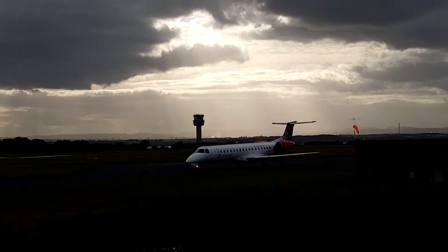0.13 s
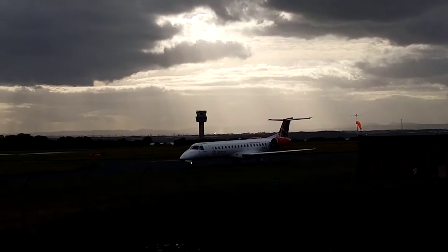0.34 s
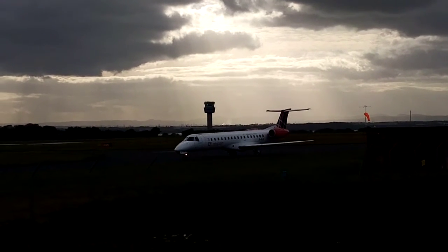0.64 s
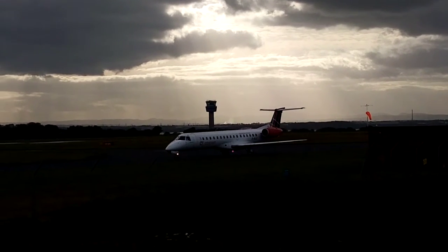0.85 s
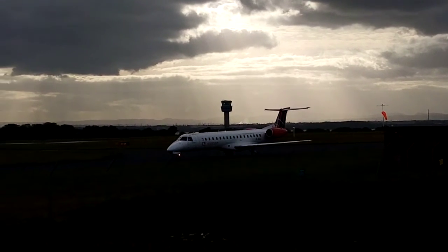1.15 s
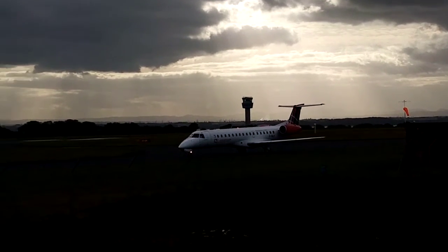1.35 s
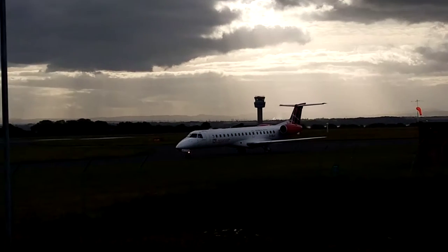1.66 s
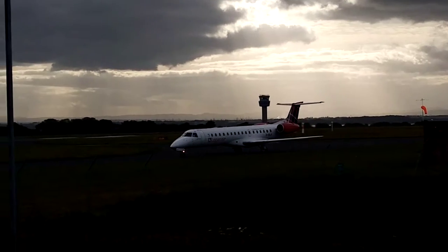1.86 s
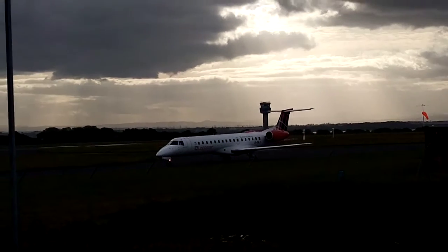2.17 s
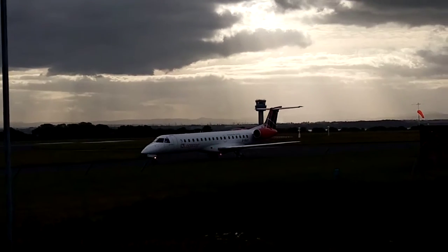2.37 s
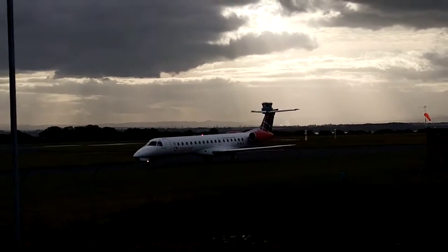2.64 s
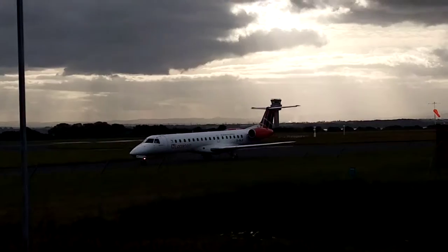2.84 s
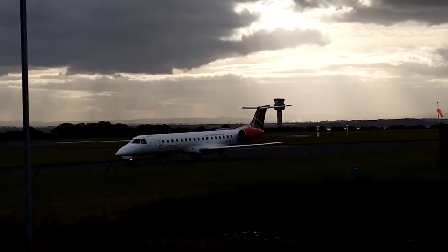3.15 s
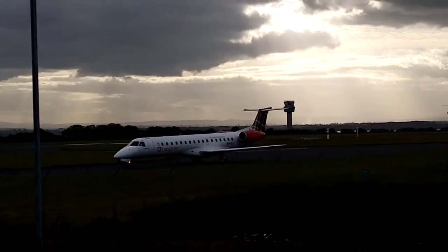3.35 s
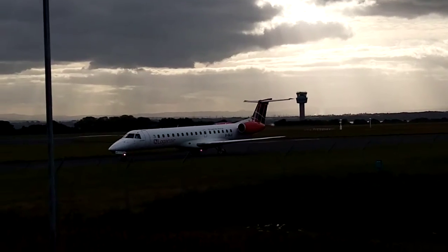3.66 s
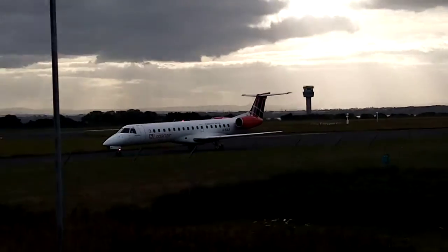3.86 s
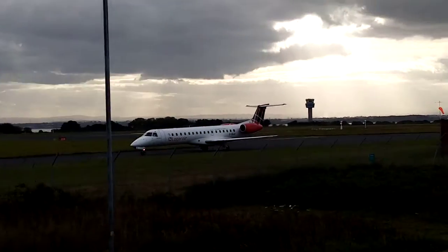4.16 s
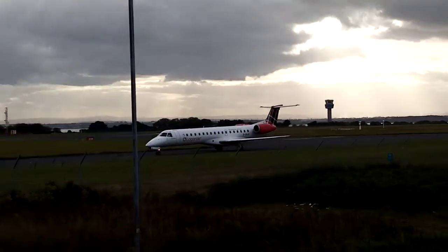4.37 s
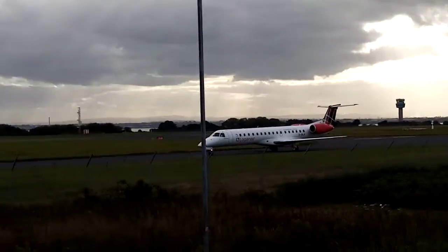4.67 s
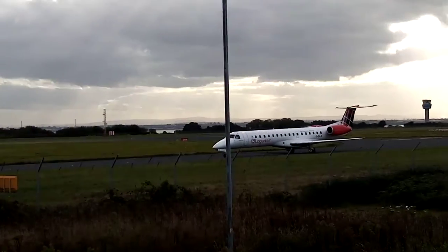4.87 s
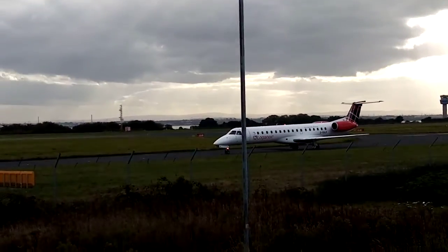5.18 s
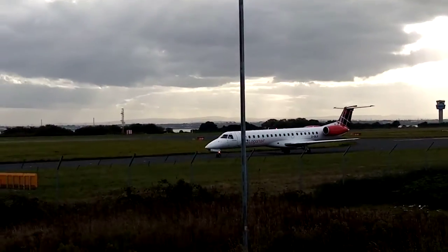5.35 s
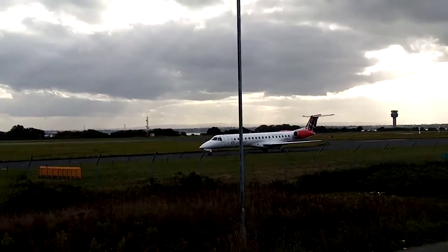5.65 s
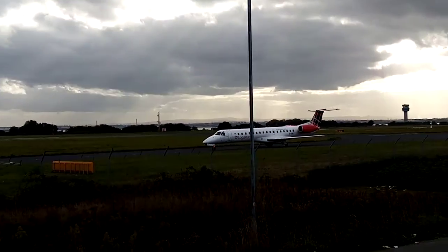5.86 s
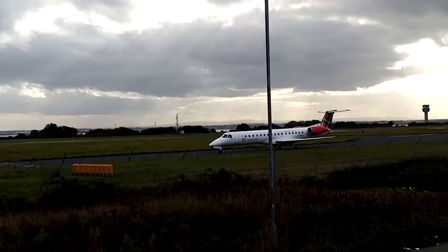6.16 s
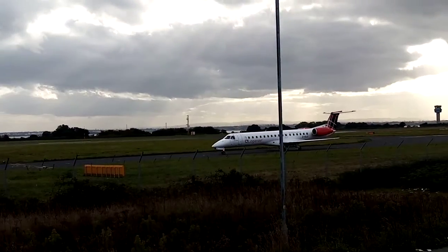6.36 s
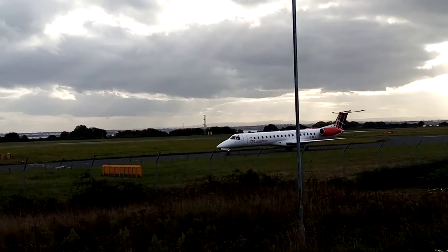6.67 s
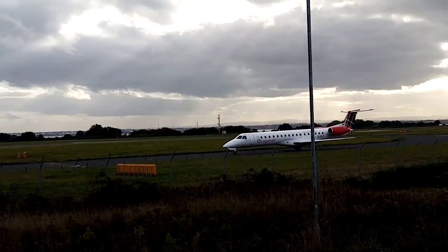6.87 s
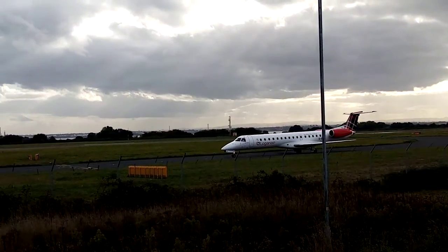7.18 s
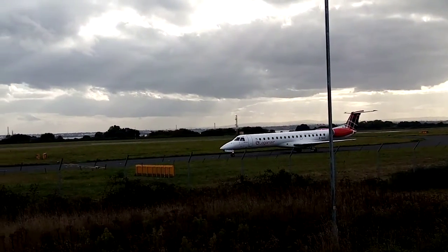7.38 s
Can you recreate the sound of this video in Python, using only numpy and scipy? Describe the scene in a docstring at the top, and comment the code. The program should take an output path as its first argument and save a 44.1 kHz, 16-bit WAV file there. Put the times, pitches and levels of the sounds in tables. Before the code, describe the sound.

In an open airfield, a distant regional jet taxis past for about 7.5 seconds. Its rear engines give a steady airy roar, a hollow drone, a flickering hiss and a thin high whine that swells and fades. At about 0.3 and 0.9 seconds, a small bird close on the right gives three very short falling ticks each time. Light wind thumps touch both sides, with a harder knock near 1.05. From 1.65 to 2.9 a heavy gust pounds the right side with low lumpy rumble, thuds and short bright spits. Wind then eases, and from 4 seconds the jet is fuller and the whine clearer, peaking around 4.6 to 6.7 while sinking slightly in pitch. Another strong right-side gust buffets from 6.4 to 6.85. A faint high sizzle surfaces on the right near 1.3 and 7.2, as the hiss and whine continue to the end.

```python
"""By an airfield fence, a regional jet taxis past, far off. Turbulence noise makes its exhaust roar and
intake hiss; sine tones with a noisy skirt make a fan whine that sinks as it passes. Restless air makes bands
of the hiss swell and fade, and hollows move through it. Gusts buffet the two microphone ports one by one as
lumpy low noise, thumps and bright spits. A thin sizzle comes and goes on the right, where a small bird
close by ticks six times in short falling whistles."""
import sys
import numpy as np
from scipy import signal
from scipy.fft import rfft, irfft, next_fast_len
from scipy.io import wavfile
from scipy.ndimage import uniform_filter1d, map_coordinates

SR = 44100
rng = np.random.default_rng(int(sys.argv[2]) if len(sys.argv) > 2 else 0)


def transcribe(signal):
    """Save signal, clipped to [-1, 1], as a 16-bit WAV file at the path in sys.argv[1]."""
    frames = np.atleast_2d(signal).T
    limited = np.clip(frames, -1, 1)
    pcm = np.round(limited * 32767).astype(np.int16)
    wavfile.write(sys.argv[1], SR, pcm)


N = 331543


def from_db(db):
    """Turn decibels into gain."""
    return 10 ** (np.asarray(db) / 20)


def rms_one(x):
    """Scale a sound to an rms (average strength) of 1."""
    return x / np.sqrt(np.mean(np.abs(x) ** 2) + 1e-20)


def in_time(rows):
    """Read each column of a table as a curve with a value at every sample."""
    s, *columns = np.transpose(rows)
    t = np.arange(N) / SR
    return [np.interp(t, s, column) for column in columns]


def at_hz(points, hz):
    """Read a table at given frequencies, with straight lines on a log-frequency axis."""
    at, value = np.transpose(points)
    return np.interp(np.log(hz + 1), np.log(at), value)


def delayed(x, s):
    """Play the same sound s seconds later."""
    return map_coordinates(x, [np.arange(N) - s * SR], order=3)


def drift(rate_hz):
    """Smooth random wandering of spread 1; a higher rate wanders faster."""
    # Drawn at an eighth of the sample rate, then filled in
    size = next_fast_len(N // 8 + 1, True)
    hz = np.fft.rfftfreq(size, 8 / SR)
    smoothing = np.exp(-.5 * (hz / rate_hz) ** 2)
    slow = irfft(rfft(rng.standard_normal(size)) * smoothing, size)
    return np.interp(np.arange(N) / 8, np.arange(size), rms_one(slow))


def noise(spectrum, likeness=None):
    """Noise of a given colour and rms 1; with a likeness table, a partly alike left and right pair."""
    size = next_fast_len(N, True)
    hz = np.fft.rfftfreq(size, 1 / SR)
    colour = from_db(at_hz(spectrum, hz))
    # Fade out below the first and above the last frequency of the table
    colour *= np.minimum(hz / spectrum[0][0], 1) ** 2 / np.maximum(hz / spectrum[-1][0], 1) ** 4
    one = rfft(rng.standard_normal(size))
    if likeness is not None:
        alike = np.clip(at_hz(likeness, hz), 0, 1)
        other = rfft(rng.standard_normal(size))
        one = np.array([alike * one + np.sqrt(1 - alike ** 2) * other, one])
    return rms_one(irfft(one * colour, size)[..., :N])


def turning(hz):
    """Phase of something that turns hz times a second."""
    return 2 * np.pi * np.cumsum(hz + np.zeros(N)) / SR


# How alike the two ports' sound is: (f/Hz, likeness from 0 to 1)
LIKENESS = [(200, 0.3), (550, 1), (1100, 0.94), (1500, 0.72), (2600, 0.84), (3800, 0.78), (5000, 0.61),
            (6500, 0.98), (8000, 0.35), (12000, .1)]


def narrow_band(hz, width_hz):
    """A partly alike pair of noises of rms 1, made by random wandering on a tone that may glide."""
    phase = turning(hz)
    cos, sin = np.cos(phase), np.sin(phase)
    one, other = [rms_one(drift(width_hz / 2) * cos + drift(width_hz / 2) * sin) for side in range(2)]
    alike = np.clip(at_hz(LIKENESS, np.mean(hz)), 0, 1)
    return np.array([alike * one + np.sqrt(1 - alike ** 2) * other, one])


def coloured(x, spectrum):
    """Pass a sound through a smooth frequency response."""
    size = next_fast_len(N + 2000, True)
    gain = from_db(at_hz(spectrum, np.fft.rfftfreq(size, 1 / SR)))
    return irfft(rfft(x, size) * gain, size)[:N]


def evened(x):
    """Hold the rms near 1 over about 27 ms, so that the strength can be set afterwards."""
    return x / np.sqrt(uniform_filter1d(x ** 2, size=1200) + 1e-9)


def bell(s, length):
    """A smooth rise and fall of height 1 around time s."""
    return np.exp(-2 * np.minimum(((np.arange(N) / SR - s) / length) ** 2, 20))


def plateau(start, length, edge_s):
    """Rise towards 1, hold and fall, with soft edges."""
    t = np.arange(N) / SR - start
    return (np.tanh(t / edge_s) - np.tanh((t - length) / edge_s)) / 2


# The engines as the jet rolls by, before the trims:
# (t/s, exhaust roar level/dB, intake rush level/dB, blade hiss level/dB)
ENGINE_LEVELS = [(0.0, -55, -45, -55), (0.04, -54, -45, -52), (0.54, -55, -50, -57.5),
                 (1.13, -54.5, -46.5, -58), (1.55, -54, -47.5, -55.5), (1.85, -53, -48, -53),
                 (2.34, -52, -46.5, -47), (2.85, -51, -49.5, -57.5), (3.3, -49, -50, -55),
                 (3.55, -49, -48.5, -52.5), (4.1, -47.5, -43.5, -49), (4.71, -48.5, -44, -49),
                 (5.11, -48, -42.5, -54), (5.32, -46.5, -44, -50.5), (6.01, -50.5, -45.5, -50),
                 (6.41, -50, -44, -49), (6.76, -50.5, -45.5, -52.5), (6.93, -52.5, -43, -46.5),
                 (7.52, -51.5, -44.5, -48.5)]
# Colours of exhaust roar, intake rush, blade hiss and finest hiss: (f/Hz, relative level per Hz/dB)
ROAR_COLOUR = [(150, -36), (220, -24.5), (300, -8), (400, -1.5), (500, 0.5), (600, 0.5), (700, -7),
               (830, -4.5), (950, -1), (1080, 3), (1220, -1.5), (1380, -5.5), (1700, -11.5)]
RUSH_COLOUR = [(1000, -38), (1400, -6), (1580, -3), (1760, -4.5), (1950, -3), (2300, -5.5), (2620, -0.5),
               (2820, -2.5), (3050, -7), (3330, -4.5), (3880, -5.5), (4200, -8.5), (4500, -10), (5200, -46)]
HISS_COLOUR = [(3600, -33), (4400, -1.5), (4750, 2), (5300, 2), (5900, 1.5), (6600, 1), (7200, -5),
               (8000, -10), (8900, -19), (9700, -44), (11500, -43), (15500, -44)]
FIZZ_COLOUR = [(6000, -24), (7200, 5), (8100, -3.5), (8900, 2.5), (10000, -9), (11000, -23), (12500, -46)]
# The finest hiss, which comes and goes: (t/s, level/dB)
FIZZ_LEVEL = [(0, -80), (1.4, -58.5), (1.9, -82), (2.9, -63.5), (3.6, -67), (4.2, -55), (5.3, -56.5),
              (6.2, -51), (7.52, -56.5)]
# The core of the exhaust, a hollow drone: (t/s, f/Hz, level/dB)
DRONE = [(0, 579.4, -45.5), (2.3, 499.4, -44), (4.3, 589.8, -42), (5.7, 600, -44.5), (7.52, 607.5, -40)]
# The intake's broad howl, which mostly climbs as the angle turns: (t/s, f/Hz, level/dB)
HOWL = [(0, 2270, -63), (1.3, 2228, -51), (3.1, 2283, -61.5), (4.6, 2468, -50), (5.3, 2505, -42),
        (6.0, 2610, -52), (7.52, 2520, -45)]
DRONE_WIDTH_HZ, HOWL_WIDTH_HZ = 260, 300


def jet_noise(roar_trim_db=6.5, rush_trim_db=3.5, hiss_trim_db=8.0, flicker_db=0.95):
    """Exhaust and intake turbulence as coloured noise; the air on the way makes rush and hiss flicker."""
    roar_db, rush_db, hiss_db = in_time(ENGINE_LEVELS)
    howl_hz, howl_db = in_time(HOWL)
    drone_hz, drone_db = in_time(DRONE)
    roar = from_db(roar_db + roar_trim_db) * noise(ROAR_COLOUR, LIKENESS)
    rush = from_db(rush_db + rush_trim_db + flicker_db * drift(5.7)) * noise(RUSH_COLOUR, LIKENESS)
    hiss = from_db(hiss_db + hiss_trim_db + flicker_db * drift(9.6)) * noise(HISS_COLOUR, LIKENESS)
    fizz = from_db(in_time(FIZZ_LEVEL)[0]) * noise(FIZZ_COLOUR, LIKENESS)
    drone = from_db(drone_db) * narrow_band(drone_hz, DRONE_WIDTH_HZ)
    howl = from_db(howl_db) * narrow_band(howl_hz, HOWL_WIDTH_HZ)
    return roar + drone + rush + hiss + fizz + howl


# The blade tone sinks as the jet turns past: (t/s, f/Hz)
DOPPLER = [(0, 4536), (1.6, 4530), (3.1, 4514), (4.7, 4483), (6.2, 4459), (7.52, 4438)]
# The blade tone, swelling and fading: (t/s, left level/dB, right level/dB)
BLADE_LEVELS = [(0, -62, -64), (.4, -57, -54), (.9, -62, -61), (1.4, -54, -54), (1.6, -56, -60),
                (1.8, -56, -54), (2.1, -59, -54), (2.3, -53, -46.5), (2.85, -60, -65), (3.15, -55, -56),
                (3.55, -59, -68), (4.1, -56, -65), (4.22, -52, -56), (4.4, -52, -53), (4.55, -45, -44),
                (4.73, -45, -41.5), (4.9, -44.5, -47.5), (5.12, -54, -64), (5.3, -48.5, -55),
                (5.6, -48, -54.5), (5.85, -43, -42), (6.22, -54, -46), (6.4, -49, -40), (6.65, -43, -40),
                (6.76, -55, -50), (7.3, -54, -50), (7.52, -55, -48)]
# The compressor tone above it: (t/s, level/dB)
COMPRESSOR_LEVEL = [(0, -52), (1.1, -63), (1.5, -56), (1.8, -56), (2.1, -43.5), (2.7, -58), (3.3, -67),
                    (4, -55), (4.5, -55), (5.05, -52.5), (5.6, -58), (7.1, -59), (7.52, -46.5)]
# Fainter engine tones at fixed pitch: (f/Hz, level once near/dB, line width/Hz)
FAINT_TONES = [(2200, -57, 40), (4211, -62, 10), (7510, -68, 14), (8940, -70, 60)]
COMPRESSOR_RATIO = 1.0862   # its pitch against the blade tone
WHINE_GRAIN_DB = 1.1   # quick flutter of the tones' level


def fan_whine(waver_hz=2.6, fading_db=1.2, far_db=-8, near_s=4.5, skirt_db=-8.0, skirt_width_hz=90):
    """Two tones share a Doppler glide; turbulence puts a noisy skirt around them and fades them."""
    t, out = np.arange(N) / SR, np.zeros((2, N))
    hz = in_time(DOPPLER)[0] + waver_hz * drift(9.9)
    for ratio, levels in ((1, BLADE_LEVELS), (COMPRESSOR_RATIO, COMPRESSOR_LEVEL)):
        port_fading = fading_db * np.array([drift(15) for port in range(2)])
        fading = port_fading + WHINE_GRAIN_DB * drift(45)
        tone = np.sqrt(2) * np.sin(turning(ratio * hz))
        skirt = from_db(skirt_db) * narrow_band(ratio * hz, skirt_width_hz)
        out += from_db(np.array(in_time(levels)) + fading) * (tone + skirt)
    distance = np.maximum(1 - t / near_s, 0)   # the faint tones emerge as the jet nears
    for tone_hz, level_db, width_hz in FAINT_TONES:
        out += from_db(level_db + far_db * distance) * narrow_band(tone_hz, width_hz)
    return out


# Bands that swell in the moving air, t at their crest:
# (t/s, length/s, f/Hz, pitch rise/Hz per s, width/Hz, level on the right before reflections/dB)
SWELLS = [(1.42, .13, 5600, 0, 1200, -46), (1.58, 0.13, 6480, 0, 1800, -46.5),
          (1.79, .08, 4750, 0, 600, -44), (2.0, 0.24, 5280, 0, 1100, -38),
          (2.27, 0.22, 5230, 0, 1000, -37.5), (2.217, .12, 6880, -1, 1500, -43.5),
          (2.667, .1, 5300, 0, 1200, -45), (3.572, 0.13, 6870, 0, 1300, -47),
          (4.323, 0.087, 6900, 0, 1400, -44), (6.18, .07, 6870, -0.5, 1400, -48),
          (2.301, 0.8, 2296, 120, 320, -42.5), (2.302, 0.97, 1728, 0, 120, -46.5),
          (2.305, 1, 2884, 1, 298, -48), (3.72, 0.66, 1745, -0.5, 150, -45.5),
          (1.9, 0.36, 2083, 0, 260, -47.5), (4.25, .45, 2084, 0, 280, -47),
          (5.45, 0.55, 1802, 0, 220, -46.5), (7.053, .3, 2100, 0, 260, -47),
          (3.9, 0.64, 2370, 130, 140, -44), (3.6, 0.63, 3555, 0.5, 260, -53),
          (4.03, 0.21, 6600, 0.5, 1850, -39.5), (5.097, 1, 1900, 130, 266.7, -45.5),
          (5.412, 0.44, 7300, -1, 1700, -45), (5.72, 0.23, 6690, 1, 120, -47),
          (6.0, 0.95, 2178, 0, 155, -43.5), (6.36, 1, 4680, 0, 480, -42.5),
          (6.4, 0.11, 6340, 0, 1200, -37.5), (6.892, .11, 6400, 0.5, 802, -40)]
SWELL_LEFT_DB = -16.5   # the left port catches less of them


def swells():
    """Eddies on the path focus one band after another onto the ports; some bands glide in pitch."""
    t, bands = np.arange(N) / SR, np.zeros((2, N))
    for s, length, hz, rise, width_hz, db in SWELLS:
        bands += from_db(db) * bell(s, length) * narrow_band(hz + rise * (t - s), width_hz)
    return bands * from_db([[SWELL_LEFT_DB], [0]])


def reflected(x, reflections, sway=0.0158, glide=0.01993):
    """Delayed copies comb the jet's noise; their paths shift slowly as it rolls and as the air moves."""
    t = np.arange(N) / SR
    out = x.copy()
    for s, db in reflections:
        # glide is the share of the delay lost each second, sway its random part
        out += from_db(db) * delayed(x, s * (1 - glide * t + sway * drift(0.8)))
    return out


def streaks(shape, size_hz, size_s):
    """Random values of spread 1 over frequency and time, smoothed across a number of steps of each."""
    field = rng.standard_normal(shape)
    for again in range(2):
        field = uniform_filter1d(field, size_hz, axis=0, mode="wrap")
        field = uniform_filter1d(field, size_s, axis=1, mode="wrap")
    return rms_one(field)


# Hollows where a second path cancels the direct one:
# (port, start t/s, end t/s, start f/Hz, end f/Hz, width/Hz, depth as level/dB)
HOLLOWS = [("right", 0.96, 3.0, 1880, 1850, 80, -6), ("right", 3.16, 5.9, 2000, 2330, 88, -2.5),
           ("right", 3.8, 6.7, 2650, 3000, 170, -4), ("right", 2.4, 4.5, 3800, 3600, 110, -4),
           ("right", 4.6, 5.5, 3800, 3600, 210, -2.2), ("left", 1.7, 5.5, 1600, 2290, 160, -1.8)]
HOLLOW_EDGE_S = .15
# Strands in the jet's noise: depth, width, life, and the pitch above which they are at full depth
STRAND_DB, STRAND_WIDTH_HZ, STRAND_S, STRAND_FULL_HZ = 1.5, 110, .45, 1800


def air_path(pair):
    """Sound paths interfere: narrow strands swell and fade, and hollows move through the noise."""
    hz, t, spectra = signal.stft(pair, SR, nperseg=2048)
    hz = hz[:, None]
    strands = streaks(spectra.shape[1:], round(STRAND_WIDTH_HZ / hz[1, 0]), round(STRAND_S / t[1]))
    strand_db = STRAND_DB * np.minimum(hz / STRAND_FULL_HZ, 1) * strands
    gain_db = np.array([strand_db, strand_db])   # the same for both ports
    for port, start, end, from_hz, to_hz, width_hz, depth_db in HOLLOWS:
        centre = np.interp(t, [start, end], [from_hz, to_hz])
        present = (np.tanh((t - start) / HOLLOW_EDGE_S) - np.tanh((t - end) / HOLLOW_EDGE_S)) / 2
        dip = np.exp(-2 * np.minimum(((hz - centre) / width_hz) ** 2, 20))
        gain_db[int(port == "right")] += depth_db * present * dip
    return signal.istft(spectra * from_db(gain_db), SR)[1][:, :N]


# The bird's ticks: (t/s, peak level on the right before echoes/dB)
TICKS = [(0.2664, -28.5), (0.3645, -29.5), (0.4647, -28), (0.852, -29), (0.9492, -29), (1.0501, -30.5)]
# Their echoes: (delay t/s, level against the tick/dB)
TICK_ECHOES = [(.0045, -7.5), (.0085, -11), (0.0198, -10), (.043, -13)]


def bird(start_hz=6950, end_hz=5850, tick_s=0.004, scatter_db=-19, scatter_s=0.025, left_db=-20):
    """Each tick is a very short falling whistle, then echoes and noisy scatter from the ground cover."""
    t, dry, tail = np.arange(N) / SR, np.zeros(N), np.zeros(N)
    scatter = narrow_band((start_hz + end_hz) / 2, 1100)
    for s, peak_db in TICKS:
        age = np.maximum(t - s + tick_s / 8, 0)   # starts just before the table's time
        u = np.minimum(age / tick_s, 1)   # 0 to 1 through the tick
        whistle = np.sin(turning(start_hz + (end_hz - start_hz) * u))
        dry += from_db(peak_db) * np.sin(np.pi * u) * whistle
        tail += from_db(peak_db + scatter_db) * u * np.exp(-np.minimum(age / scatter_s, 20))
    echoes = sum(from_db(db) * delayed(dry, s) for s, db in TICK_ECHOES)
    heard = dry + tail * scatter + echoes
    return heard * from_db([[left_db], [0]])


# The light breeze between gusts, before wander and trims: (t/s, left rumble level/dB, right rumble level/dB)
BREEZE = [(0, -39, -46), (.35, -37.5, -36.5), (.7, -37.5, -38.5), (1.2, -35, -44), (1.5, -38, -45),
          (2.7, -50, -34), (3.15, -38.5, -41.5), (3.9, -52.5, -45), (4.6, -46, -39.5), (5.5, -47, -43.5),
          (6.6, -43, -35.5), (7.52, -35, -45.5)]
# Flutter against rumble; depth and pace of the breeze's random swings
BREEZE_FLUTTER_DB, BREEZE_WANDER_DB, BREEZE_WANDER_HZ = -16, 2.5, 7.8
# Gusts, each on one port, before trims: (port, start t/s, length/s, rumble level/dB, flutter level/dB)
GUSTS = [("left", 0.0, 0.042, -29.5, -33.5), ("left", 0.092, 0.047, -31, -40),
         ("left", .39, .05, -32, -38.5), ("right", 0.075, 0.064, -28.5, -53),
         ("right", 0.264, 0.03, -28.5, -39), ("left", 0.47, 0.081, -31.5, -30.5),
         ("left", .855, .025, -32, -36.5), ("right", 0.612, 0.036, -35, -45),
         ("right", 0.844, .16, -28, -43.5), ("right", 0.99, 0.018, -25.5, -33.5),
         ("right", 1.04, 0.047, -24, -28.5), ("left", 1.045, 0.051, -26.5, -32),
         ("left", 1.145, .045, -33, -36), ("left", 1.25, 0.045, -28, -28), ("right", 1.35, 0.043, -32, -43),
         ("right", 1.67, 1.18, -24, -33.5), ("right", 1.685, 0.042, -18.5, -17),
         ("right", 1.76, 0.077, -19.5, -27), ("right", 1.915, .09, -19.5, -26),
         ("right", 2.005, 0.117, -18, -22), ("right", 2.19, 0.09, -22, -28),
         ("right", 2.325, 0.088, -20.5, -28), ("right", 2.455, 0.083, -21, -24),
         ("right", 2.58, 0.12, -22.5, -33.5), ("right", 2.725, .025, -19, -30),
         ("right", 2.797, 0.048, -17.5, -26), ("left", 3.56, .07, -30.5, -54),
         ("right", 3.6, 0.042, -30, -42.5), ("right", 4.74, .07, -32.5, -40),
         ("right", 6.02, 0.043, -31, -45), ("right", 6.26, 0.038, -29, -37.5),
         ("right", 6.36, .05, -29, -31), ("right", 6.395, 0.03, -21, -31),
         ("right", 6.425, 0.056, -20, -21), ("right", 6.5, 0.11, -21, -20),
         ("right", 6.63, 0.097, -19.5, -21.5), ("right", 6.745, 0.047, -17.5, -19),
         ("right", 6.81, 0.035, -26, -42), ("right", 6.895, 0.051, -26.5, -29),
         ("left", 7.18, 0.16, -31.5, -36), ("right", 7.21, .08, -34.5, -45)]
GUST_ATTACK_S, GUST_RELEASE_S = 0.017, 0.014


def airflow(port):
    """Rumble and flutter on one port in dB: a wandering breeze, and gusts that rise, hold and drop."""
    t = np.arange(N) / SR
    breeze_db = in_time(BREEZE)[port == "right"] + BREEZE_WANDER_DB * drift(BREEZE_WANDER_HZ)
    strength = from_db([breeze_db, breeze_db + BREEZE_FLUTTER_DB])
    for side, start, length, *levels_db in GUSTS:
        if side == port:
            # 0 during the gust, growing before and after it
            away = np.maximum((start - t) / GUST_ATTACK_S, (t - start - length) / GUST_RELEASE_S)
            gust = np.outer(from_db(levels_db), np.exp(-np.clip(away, 0, 20)))
            strength = np.maximum(strength, gust)   # the stronger one wins
    return 20 * np.log10(strength)


# Colours of the slowest, large and small eddies on a port: (f/Hz, relative level per Hz/dB)
SLOW_EDDIES = [(20, -2), (35, -14), (55, -5.5), (80, 5.5), (110, 3), (170, -32.5)]
RUMBLE_COLOUR = [(20, -26), (35, -30), (50, -23.5), (70, -9), (100, -0.5), (140, 1.5), (190, -4),
                 (250, -11), (400, -24.5)]
FLUTTER_COLOUR = [(130, -9.5), (190, 0.5), (235, -1), (320, -1.5), (450, -7), (620, -14.5), (850, -23),
                  (1200, -36), (2000, -40), (5000, -62)]


def wind(port, lumpy_db, rumble_trim_db, flutter_trim_db, slow_db=-27.5, slow_growth=0.28, puffy_db=0.78):
    """Eddies strike one port in lumps; the slowest ones grow less with a gust than the rumble does."""
    rumble_db, flutter_db = airflow(port)
    slow = from_db(slow_db + slow_growth * rumble_db) * evened(noise(SLOW_EDDIES))
    rumble = from_db(rumble_db + rumble_trim_db) * evened(noise(RUMBLE_COLOUR))
    lumpy = noise(FLUTTER_COLOUR) * from_db(lumpy_db * drift(60))
    flutter = from_db(flutter_db + flutter_trim_db) * evened(lumpy)
    puffs = rms_one(from_db(puffy_db * drift(19.6)))
    return slow + (rumble + flutter) * puffs


# Single hard eddies that thump a port: (t/s, port, envelope level/dB, f/Hz, length in swings)
THUMPS = [(.012, "left", -17.5, 146, .8), (.085, "right", -19, 150, .9), (.11, "right", -22, 210, .8),
          (.21, "left", -24, 170, 1), (.273, "left", -25.5, 142, 1.1), (.327, "left", -24, 150, 1.2),
          (.384, "right", -25, 180, 1), (.485, "left", -19.5, 231, 1.2), (.545, "right", -23, 260, 1),
          (.628, "right", -21, 203, .8), (.785, "left", -25, 240, 1), (.87, "left", -20, 153, 1.4),
          (.896, "right", -17, 200, 1), (.955, "right", -18, 210, 1), (1.053, "right", -10.5, 180, 1.1),
          (1.095, "left", -16.5, 150, 1.1), (1.2, "left", -24, 118, 1), (1.294, "left", -20, 175, 1.6),
          (1.374, "right", -20, 230, .9), (1.422, "left", -22, 124, 1.3), (1.649, "right", -14, 227, .7),
          (1.696, "right", -10, 227, 1.7), (1.725, "right", -11, 280, .6), (1.833, "right", -9.5, 148, 2.2),
          (1.915, "right", -12, 170, 1.1), (1.952, "right", -10, 187, 1.3), (2.016, "right", -11, 220, 1.4),
          (2.119, "right", -4.5, 160, .6), (2.245, "right", -11.5, 164, 1), (2.355, "right", -12, 145, 3),
          (2.465, "right", -15, 380, .5), (2.497, "right", -11, 190, 1), (2.53, "right", -12.5, 170, 1),
          (2.743, "right", -11.5, 150, 1.8), (2.799, "right", -7.5, 125, .8),
          (2.852, "right", -8.5, 150, 1.2), (2.995, "right", -26, 233, 1.2),
          (3.233, "left", -21.5, 154, .9), (3.294, "left", -29, 146, 1), (3.618, "right", -21, 147, 1),
          (3.966, "right", -23, 200, .9), (4.139, "right", -25, 216, 1.6), (4.792, "right", -20, 164, .55),
          (4.923, "right", -26, 150, .8), (5.17, "right", -27, 150, .9), (5.307, "left", -29.5, 190, .9),
          (5.903, "right", -24, 148, 1), (5.964, "left", -28, 178, .8), (6.3, "right", -22, 120, 1.5),
          (6.438, "right", -14, 280, 1.1), (6.566, "right", -12.5, 250, .9), (6.68, "right", -14, 240, 1.2),
          (6.72, "right", -11, 160, 1.4), (6.757, "right", -11, 260, .6), (6.783, "right", -11, 200, 1.3),
          (7.314, "left", -23, 200, 1.7), (7.432, "left", -27, 156, 1.8)]


def thumps(port, wobble=0.075):
    """A hard eddy pulls on the diaphragm and shakes it unevenly for a few swings at most."""
    t, out = np.arange(N) / SR, np.zeros(N)
    uneven = wobble * drift(70)
    for s, side, peak_db, hz, swings in THUMPS:
        if side == port:
            near = np.abs(t - s) < .08
            turns = (t[near] - s) * hz
            shake = np.sin(2 * np.pi * (turns + uneven[near]))
            out[near] += from_db(peak_db) * shake / np.cosh(np.clip(2 * turns / swings, -20, 20))
    return out


# Bright bursts at the crests of gusts, on the right port: (t/s, length/s, level/dB)
SPITS = [(1.698, .007, -19.5), (1.724, .016, -29), (1.79, 0.0065, -27), (2.094, 0.02, -29.5),
         (2.12, .005, -24.5), (2.405, 0.022, -33), (2.459, 0.017, -29), (2.605, .005, -30),
         (2.847, .006, -29), (6.475, .008, -29), (6.593, 0.015, -22.5), (6.637, 0.0068, -27.5),
         (6.688, 0.016, -27), (6.757, 0.0055, -21), (6.797, 0.025, -26), (6.952, 0.007, -30)]
# Their colour: (f/Hz, relative level per Hz/dB)
SPIT_COLOUR = [(350, -1.5), (600, 4), (900, -4), (1250, -16.5), (1800, -30.5)]


def spits():
    """At the crest of a gust the flow tears at the port's edge in a short, bright burst of noise."""
    return sum(from_db(db) * bell(s, length) for s, length, db in SPITS) * noise(SPIT_COLOUR)


# A thin high sizzle on the right: (start t/s, length/s, level before soft edges/dB)
SIZZLE = [(0, .1, -64), (1.17, 0.36, -60), (3.05, 0.42, -71), (7.03, 0.34, -53)]
# Its colour: (f/Hz, relative level per Hz/dB)
SIZZLE_COLOUR = [(7000, -36), (9500, -8), (12000, -13.5), (13800, -20.5), (14500, -4), (15300, -1.5),
                 (16000, -9)]
SIZZLE_REST_DB = -81   # what stays of it in between


def sizzle(edge_s=0.078):
    """A thin, very high noise that swells and fades a few times."""
    swelling = sum(from_db(db) * plateau(s, length, edge_s) for s, length, db in SIZZLE)
    return (from_db(SIZZLE_REST_DB) + swelling) * noise(SIZZLE_COLOUR)


# Reflections off fence, pole and ground cover: (delay at the start t/s, level against the direct sound/dB)
REFLECTIONS_LEFT = [(.0031, -36), (.0073, -14.5), (.0187, -16.5)]
REFLECTIONS_RIGHT = [(.0024, -31), (.0058, -19), (0.0149, -19)]
# The left port is weaker and has a colour of its own: (f/Hz, level against the right/dB)
LEFT_PORT = [(250, -6.5), (500, -3.5), (1000, -5.5), (1480, -9), (1750, -6), (2000, -3.5), (2400, -6.5),
             (2900, -2.5), (3450, -3.5), (4400, -5.5), (5000, -7), (6500, -8), (7300, -7.5), (10000, -12)]
# The jet reaches the right port later; the lag mostly shrinks as the angle turns: (t/s, lag/s)
RIGHT_LAG = [(0, .000905), (2.2, .000925), (3.7, .000925), (4.7, .00089), (5.5, .000865), (6.5, .000855),
             (7.52, .00083)]


def scene():
    """The jet reaches the left port first but is mostly louder on the right; each port has its own wind."""
    jet, whine, swelling = jet_noise(), fan_whine(), swells()
    jet_left = reflected(jet[0], REFLECTIONS_LEFT)
    jet_right = reflected(jet[1] + swelling[1], REFLECTIONS_RIGHT)
    jet = air_path(np.array([jet_left, jet_right]))
    left = coloured(jet[0] + whine[0], LEFT_PORT) + swelling[0]
    right = delayed(jet[1] + whine[1], in_time(RIGHT_LAG)[0])
    left = left + wind("left", lumpy_db=3.8, rumble_trim_db=-2.0, flutter_trim_db=-1.5, slow_db=-33.0)
    left = left + thumps("left")
    right = right + wind("right", lumpy_db=3.5, rumble_trim_db=-2.0, flutter_trim_db=0.0)
    right = right + thumps("right") + spits() + sizzle()
    return np.array([left, right]) + bird()


LOW_CUT_HZ, CUTOFF_HZ = 48.5, 15700


def record(dry):
    """The microphone sheds the deepest rumble; the top is cut steeply."""
    low_cut = signal.butter(3, LOW_CUT_HZ, "high", fs=SR, output="sos")
    high_cut = signal.ellip(10, .1, 80, CUTOFF_HZ, fs=SR, output="sos")
    lean = signal.sosfilt(low_cut, dry)
    return signal.sosfilt(high_cut, lean)


dry = scene()
out = record(dry)
transcribe(out)
```